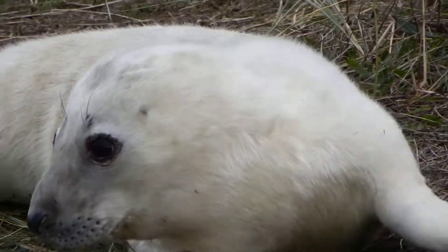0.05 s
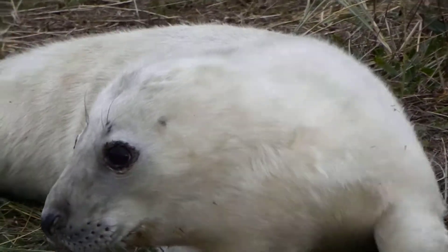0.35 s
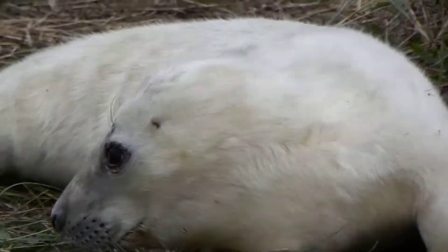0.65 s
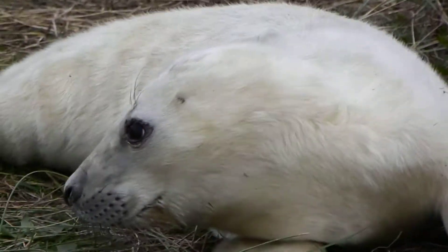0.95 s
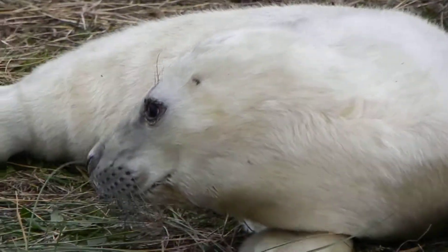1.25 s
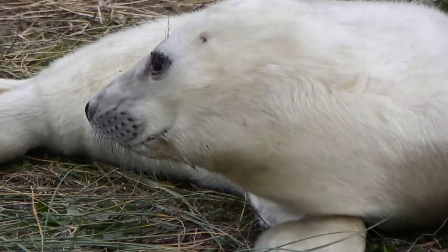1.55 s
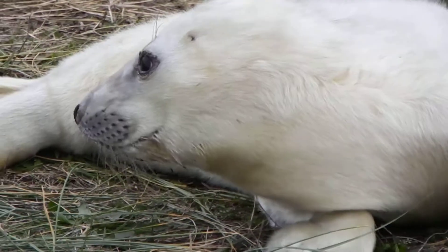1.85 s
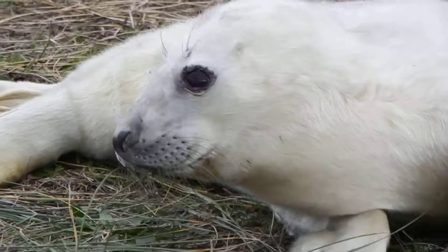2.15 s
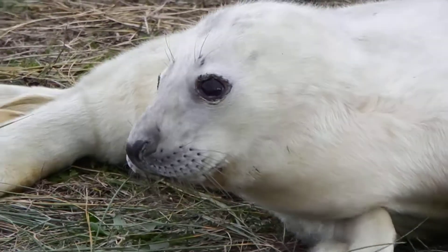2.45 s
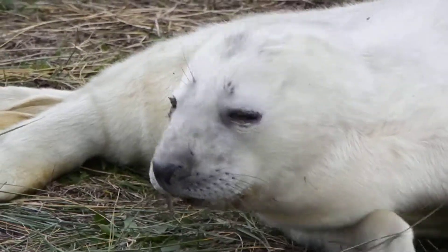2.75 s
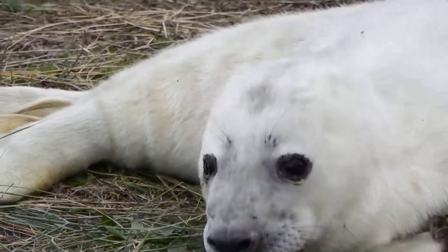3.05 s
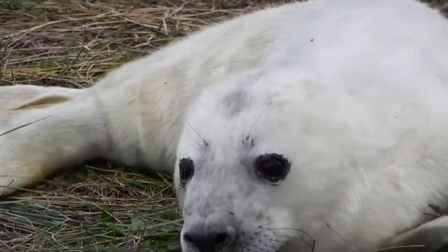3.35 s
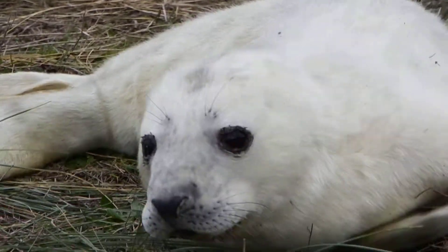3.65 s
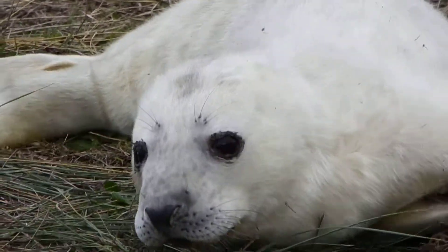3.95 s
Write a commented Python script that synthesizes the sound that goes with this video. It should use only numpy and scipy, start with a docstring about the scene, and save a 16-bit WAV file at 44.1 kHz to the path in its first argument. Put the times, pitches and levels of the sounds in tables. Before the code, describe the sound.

Wind buffets the microphone on open grass, over faint far surf and a thin hiss. In the first half second, while the air is calmer, a seal gives a hoarse, quavering wail some way off. From about 0.5 seconds, gusts rumble and sputter unevenly, with scattered ticks and dull pops. The wind lulls just after 3 seconds, then returns, with its hardest thump near 3.7 seconds.

```python
"""Gusts buffet the two ports of a camera microphone on open grass, over far surf and preamplifier hiss.
In the first half second a seal wails some way off, and its echo fades under the rising, sputtering wind.
From then on slams of air overload the input with a tick; the hardest push the limiter down, so the hiss
sinks and creeps back. The wind lulls just after 3 s, then returns with the biggest slam of all.
Throughout, a wind filter thins the bass and a narrow notch cuts the lower treble."""
import sys
import numpy as np
from scipy import signal
from scipy.io import wavfile

SR = 44100
rng = np.random.default_rng(int(sys.argv[2]) if len(sys.argv) > 2 else 0)


def transcribe(signal):
    """Save signal, clipped to [-1, 1], as a 16-bit WAV file at the path in sys.argv[1]."""
    frames = np.atleast_2d(signal).T
    limited = np.clip(frames, -1, 1)
    pcm = np.round(limited * 32767).astype(np.int16)
    wavfile.write(sys.argv[1], SR, pcm)


N = 176400
TIME = np.arange(N) / SR
THRESHOLD, CUTOFF_HZ = 0.75, 15650   # the limiter's threshold and the top of the microphone's range


def from_db(db):
    """Decibels to gain."""
    return 10 ** (np.asarray(db) / 20)


def in_time(rows):
    """Each column of a timed curve at every sample."""
    times, *columns = np.transpose(rows)
    return [np.interp(TIME, times, column) for column in columns]


def butter(x, hz, kind, order=2):
    """Causal Butterworth filter."""
    return signal.sosfilt(signal.butter(order, hz, kind, fs=SR, output="sos"), x + 1e-18)


def drift(rate_hz):
    """Smooth random wobble with a spread of 1, mostly slower than the given rate."""
    step, settle = 40, 2000
    pole = np.exp(-2 * np.pi * rate_hz * step / SR)
    white = rng.standard_normal(N // step + settle + 2)
    slow = signal.lfilter([1], [1, -2 * pole, pole * pole], white)[settle:]
    return np.interp(np.arange(N) / step, np.arange(len(slow)), slow / slow.std())


def noise_bands(spectrum, count):
    """Yields (centre Hz, noise) for steep bands that together have the given colour."""
    hz, db = np.transpose(spectrum)
    edges = np.geomspace(hz[0], min(hz[-1], SR * .45), count + 1)
    white = rng.standard_normal((2, N)) * np.sqrt(SR / 2)
    for k, (low, high) in enumerate(zip(edges, edges[1:])):
        centre = np.sqrt(low * high)
        gain = from_db(np.interp(np.log(centre), np.log(hz), db))
        yield centre, gain * butter(white[k % 2], [low, high], "band", order=4)


def coloured(spectrum):
    """Steady noise of the given colour."""
    return sum(band for _, band in noise_bands(spectrum, count=14))


def soften(clicks, hz, order):
    """Rounds clicks off with a low-pass, making up for the height that it takes away."""
    return butter(clicks, hz, "low", order) * SR / (2 * np.pi * hz)


def preamp_hiss():
    """The steady, bright noise floor of one preamplifier."""
    # colour of the hiss: (frequency [Hz], density [dB per Hz])
    colour = [(200, -108.5), (4000, -102), (7000, -101.5), (10000, -98.5), (14000, -96), (16000, -83)]
    return coloured(colour)


def shore():
    """The distant wash of surf and colony, almost the same at both ports."""
    # rise and fall of the wash: (time [s], gain [dB])
    fader = [(0, -4), (.2, -1), (.48, -0.5), (1.2, -7), (3, -5.5), (3.3, -4.5)]
    # colour of the wash ahead of the fader: (frequency [Hz], density [dB per Hz])
    colour = [(40, -50), (120, -70.5), (300, -84), (620, -74.5), (900, -82), (1400, -87), (2200, -110),
              (4000, -100)]
    gain_db, = in_time(fader)
    middle = coloured(colour)
    sides = 0.12 * coloured(colour) * np.array([[1], [-1]])
    return from_db(gain_db) * (middle + sides)


def seal():
    """A hoarse, quavering wail that rises, drops and holds, with scattered outdoor echoes."""
    # contour of the call: (time [s], pitch [Hz], level [dB])
    wail = [(0, 551, -43), (.09, 623, -40), (0.151, 612.4, -44), (.17, 544, -44), (.22, 538.3, -37.5),
            (0.361, 536.5, -37), (.4, 570.6, -45.5), (.47, 518, -43), (.52, 530, -61)]
    jitter, flutter_db = 0.01, 0.5
    rasp_hz, rasp_wander_hz, rasp_db = 97.2, 21.8, -9.5
    octave_db, octave_rise_db_per_s = -20.5, 18.5
    echo_db, echo_t60_s = -1, 2.9
    hz, level_db = in_time(wail)
    end_s = wail[-1][0]
    phase = 2 * np.pi * np.cumsum(hz * (1 + jitter * drift(51))) / SR
    rasp_phase = 2 * np.pi * np.cumsum(rasp_hz + rasp_wander_hz * drift(22)) / SR
    rasp = from_db(rasp_db) * np.exp(1j * rasp_phase)
    effort = from_db(level_db + flutter_db * drift(70)) * (TIME < end_s)
    octave = from_db(octave_db + octave_rise_db_per_s * np.minimum(TIME, end_s))
    tone = np.exp(1j * phase) + octave * np.exp(2j * phase)
    # a slow rattle in the throat adds two side tones above each partial
    voice = np.sqrt(2) * np.imag(tone * (1 + rasp + rasp ** 2)) * effort
    scatter = rng.standard_normal(N) * from_db(-60 * TIME / echo_t60_s)
    echo = signal.fftconvolve(voice, scatter / np.linalg.norm(scatter))[:N]
    return voice + from_db(echo_db) * echo


def eddies(side):
    """The swirl of air passing one port: random eddies, broken by single hard puffs."""
    # puffs of air: (time [s], left strength [eddy spreads], right strength [eddy spreads])
    puffs = [(0.18, 1.5, 2.8), (0.422, 4.5, -0.5), (0.492, 6, 3.9), (0.686, 2, 0.17), (0.861, 3.5, 2.9),
             (1.097, 3, 2.06), (1.143, 3, 2.66), (1.428, 3.5, 2.5), (2.384, 2, 1.86), (2.874, -3, 1.3),
             (3.281, 2.5, 3), (3.823, -5, 3)]
    puff_width_s = 0.0036
    swirl = np.minimum(drift(rate_hz=59), 2)
    for at_s, *strengths in puffs:
        blend = np.exp(-.5 * ((TIME - at_s) / puff_width_s) ** 2)
        swirl = swirl + blend * (strengths[side] - swirl)
    return swirl


def sputter(swirl, force_db, edge_hz):
    """Each strong eddy breaks at its crest with a short pop of limited size."""
    min_gap_s, boost_db, ceiling = 0.0092, 19.5, 0.99
    crests, _ = signal.find_peaks(swirl, height=0.73, distance=1 + min_gap_s * SR)
    clicks = np.zeros(N)
    clicks[crests] = ceiling * np.tanh(from_db(force_db[crests] + boost_db) / ceiling)
    return soften(clicks * rng.choice([-1, 1], N), edge_hz, order=5)


def buffeting(side):
    """Turbulence at one port (0 left, 1 right): fast air is louder and brighter, as is each eddy."""
    # gusts at the left port: (time [s], gain at the pivot [dB], dullness [dB per kHz])
    left_gusts = [(0.0, -15, 62), (0.06, -42, 131), (0.18, -27, 97), (0.23, -65.5, 55), (0.46, -23.5, 88),
                  (0.52, -29.5, 52), (0.54, -20.5, 12), (0.59, -22.5, 7.5), (0.62, -24, 57),
                  (0.66, -11.5, 23), (0.9, -18, 42.5), (0.98, -10, 21.5), (1.11, -17, 39), (1.2, -45, 66),
                  (1.47, -12.5, 38.5), (1.63, -18, 25.5), (1.67, -36, 71), (1.79, -18.5, 32),
                  (1.9, -18, 25.5), (1.94, -18, 39), (2.015, -13, 26.5), (2.05, -11, 31.5), (2.18, -24, 60),
                  (2.24, -13, 36.5), (2.28, -27, 33), (2.31, -7, 25.5), (2.43, -21.5, 24),
                  (2.47, -13, 12.5), (2.51, -16, 28.5), (2.62, -9.5, 19.5), (2.81, -23, 33),
                  (2.84, -20.5, 13), (2.91, -28, 82), (3.07, -43, 112), (3.26, -32, 66), (3.283, -22, 23.5),
                  (3.33, -33.5, 100), (3.45, -15.5, 48), (3.49, -28.5, 46), (3.57, -16.5, 34),
                  (3.66, -17, 35), (3.69, -11.5, 32), (3.8, -16, 18), (3.97, -10.5, 21.5)]
    # gusts at the right port: (time [s], gain at the pivot [dB], dullness [dB per kHz])
    right_gusts = [(0.02, -18, 56), (0.06, -52, 160), (0.19, -36.5, 43), (0.21, -47, 71), (0.36, -50, 32),
                   (0.399, -22, 43.4), (0.5, -25.5, 51), (0.582, -8.5, 9.4), (0.67, -22.5, 39),
                   (0.705, -10.5, 26.4), (0.821, -15.5, 45), (0.842, -18, 13), (0.9, -20, 71),
                   (0.962, -11, 19), (1.012, -29, 50), (1.069, -12.5, 28.3), (1.159, -10, 32.7),
                   (1.225, -17.5, 33), (1.291, -31.5, 62), (1.326, -14, 47), (1.372, -28.5, 75),
                   (1.394, -14.5, 34.5), (1.44, -17.5, 49), (1.69, -26, 65), (1.92, -13, 35),
                   (1.98, -17.5, 66), (2.099, -11.5, 26), (2.18, -19, 56), (2.36, -18, 50),
                   (2.38, -10.5, 18.3), (2.51, -17, 34), (2.701, -9.5, 15.2), (2.88, -15, 22.3),
                   (2.99, -34, 80), (3.15, -53, 156), (3.26, -29.5, 120), (3.289, -23, 27),
                   (3.309, -32, 70), (3.69, -13.5, 54), (3.735, -10, 18.7), (3.85, -13, 54),
                   (3.91, -10, 17.4), (3.97, -14.5, 38)]
    # colour of the rumble before the gusts shape it: (frequency [Hz], density [dB per Hz])
    colour = [(30, -32), (60, -35), (100, -35), (170, -31), (260, -28), (500, -26), (900, -26), (1400, -32),
              (2150, -45)]
    pivot_hz, sputter_hz = 250, 1056
    eddy_db, eddy_brightening = 3, 0.083
    # the air throbs at one pitch at the left port; the right has a slight dip there
    ring_hz, ring_octaves, ring_db = 248, 0.45, (3, -2.5)
    level_db, dullness = in_time((left_gusts, right_gusts)[side])
    swirl = eddies(side)
    level_db = level_db + eddy_db * swirl
    tilt_db_per_hz = dullness / 1000 * np.exp(-eddy_brightening * swirl)
    force_db = level_db - tilt_db_per_hz * (sputter_hz - pivot_hz)
    wind = sputter(swirl, force_db, sputter_hz)
    for hz, band in noise_bands(colour, count=26):
        throb_db = ring_db[side] * np.exp(-.5 * (np.log2(hz / ring_hz) / ring_octaves) ** 2)
        wind += band * from_db(level_db + throb_db - tilt_db_per_hz * (hz - pivot_hz))
    return wind


def slams():
    """Pressure swells too slow to hear overload the input: a tick on a dull pop, brighter when harder."""
    # slams of air: (time [s], pressure over the threshold [dB], click level [dB], left minus right [dB])
    hits = [(0.565, 0, -35, -33), (.574, -3, -26, 1), (0.595, -0.5, -23, -20), (.974, 4.5, -27, 8),
            (1.22, 1.5, -34, -17), (1.494, -1, -35, 26.5), (1.618, 0, -28, 13.5), (1.906, -1.5, -29.5, 7.5),
            (2.013, -0.5, -30.5, 22.5), (2.019, -28, -28, 24), (2.110, 7.5, -19, -8.5),
            (2.384, 3.5, -31.5, -8), (2.629, 3, -24, 11), (2.874, 5, -24, -14.5), (3.609, 1.5, -31, 13.5),
            (3.741, 8.5, -20, -15.5), (3.957, 4.5, -21, 13.5)]
    swell_width_s, swell_lag_s = 0.012, 0.016
    tick_low_hz, tick_rolloff_hz, top_at_threshold_hz = 2800, 3820, 6500
    pop_hz, pop_db = 855, 23
    out = np.zeros((2, N))
    for at_s, over_db, click_db, pan_db in hits:
        force = from_db(over_db)
        swell = THRESHOLD * force * np.exp(-.5 * ((TIME - at_s - swell_lag_s) / swell_width_s) ** 2)
        click = np.zeros(N)
        click[int(at_s * SR)] = from_db(click_db)
        tick = soften(butter(click, tick_low_hz, "high"), tick_rolloff_hz, order=1)
        tick = butter(tick, min(top_at_threshold_hz * force, CUTOFF_HZ), "low", order=4)
        pop = from_db(pop_db) * soften(click, pop_hz, order=5)
        pan = from_db(np.array([[.5], [-.5]]) * pan_db)
        out += swell + (tick + pop) * pan
    return out


def limiter(x):
    """One gain for both sides: it ducks fast on a peak and climbs back at a steady rate."""
    attack_s, release_db_per_s = 0.00019, 17.5
    over_db = 20 * np.log10(np.maximum(abs(x).max(axis=0) / THRESHOLD, 1))
    release_db = release_db_per_s * TIME
    held_db = np.maximum.accumulate(over_db + release_db) - release_db
    pole = np.exp(-1 / (attack_s * SR))
    return x * from_db(-signal.lfilter([1 - pole], [1, -pole], held_db))


def scene():
    """Each port has its own wind and hiss; the slams and the far sounds reach both."""
    ports = np.array([buffeting(side) + preamp_hiss() for side in (0, 1)])
    return ports + slams() + seal() + shore()


def record(dry):
    """The camera's chain: limiter, wind filter, notch and a steep top cut."""
    wind_filter_hz, notch_hz, notch_width_hz = 85.8, 2523, 460
    x = butter(limiter(dry), wind_filter_hz, "high", order=4)
    x = butter(x, [notch_hz - notch_width_hz / 2, notch_hz + notch_width_hz / 2], "bandstop", order=1)
    return signal.sosfilt(signal.ellip(10, .1, 80, CUTOFF_HZ, fs=SR, output="sos"), x)


dry = scene()
out = record(dry)
transcribe(out)
```